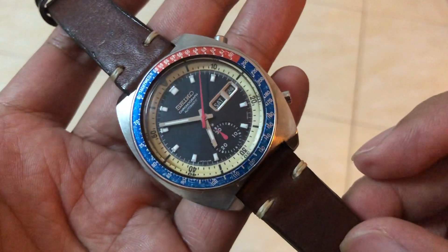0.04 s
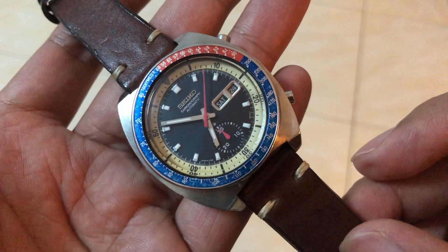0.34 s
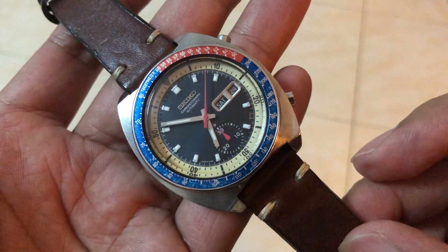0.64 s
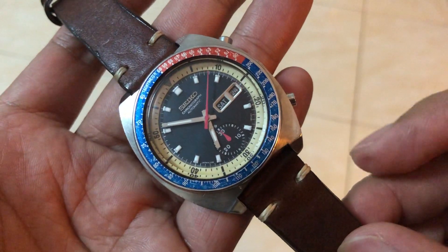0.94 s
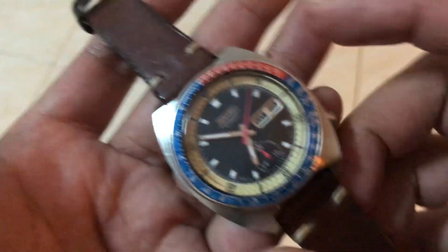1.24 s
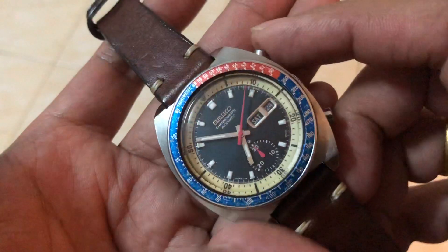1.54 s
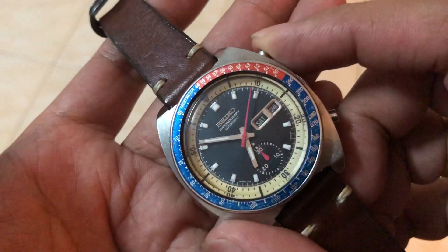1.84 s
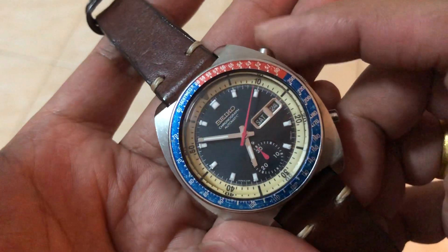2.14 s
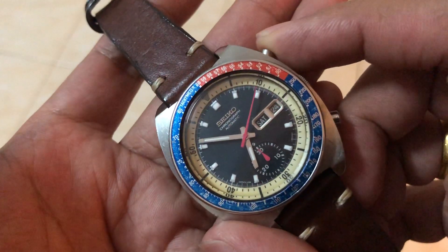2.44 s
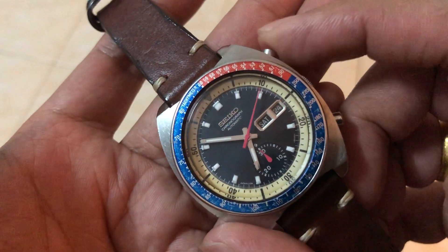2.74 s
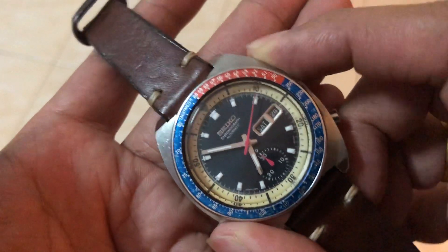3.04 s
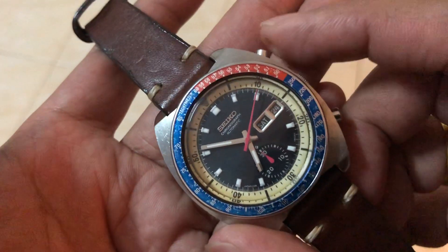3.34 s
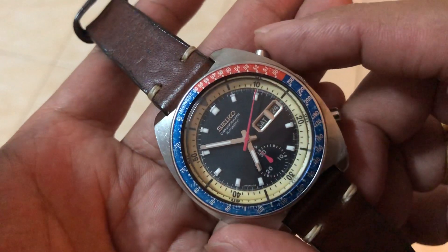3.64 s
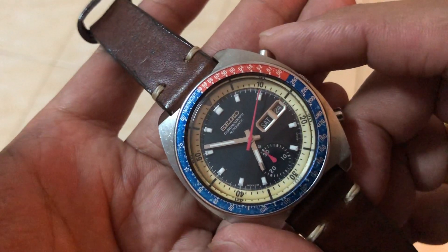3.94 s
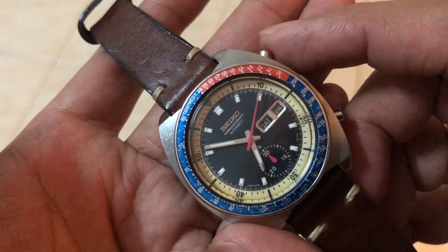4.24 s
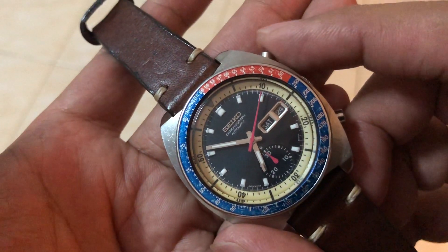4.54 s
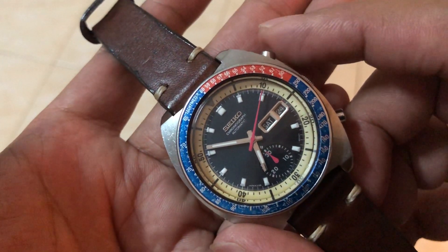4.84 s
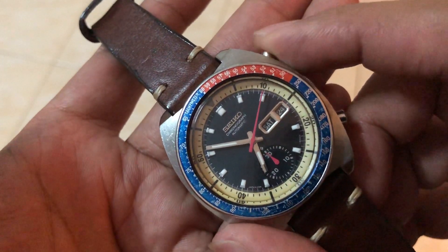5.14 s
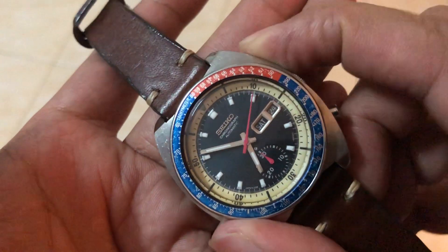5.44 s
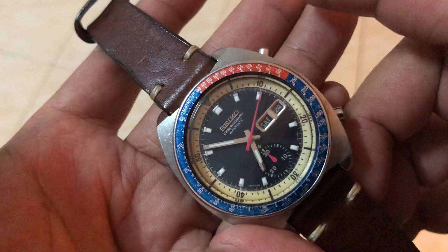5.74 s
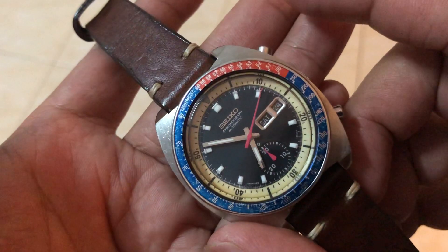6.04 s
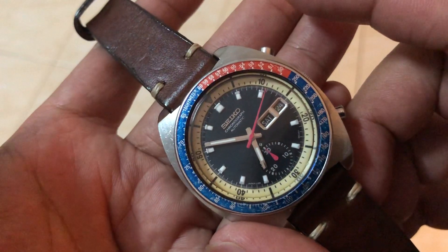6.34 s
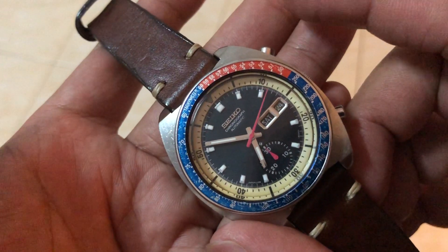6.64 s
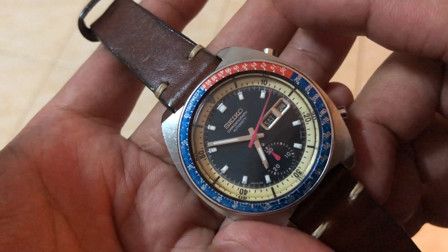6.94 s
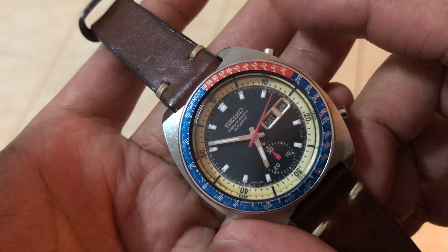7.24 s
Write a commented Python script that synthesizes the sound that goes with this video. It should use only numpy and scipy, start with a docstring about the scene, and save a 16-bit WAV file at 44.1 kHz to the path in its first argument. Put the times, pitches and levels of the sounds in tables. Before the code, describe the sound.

A mechanical wristwatch ticks faintly close to the microphone, about six thin, high ticks a second, growing slightly clearer over the first second and a half. Behind it, a distant appliance gives a low, wavering hum and a soft airy swish about twice a second. Between 2 and 3 seconds, a few tiny clicks come from the button taking up its slack. At 3 seconds the button is pressed with a sharp, bright metallic snap that dies almost at once, and at 3.2 seconds it springs back with a lighter click. At about 5.4 seconds comes a second snap, slightly fuller, followed by a softer release click near 5.6 seconds. Both presses stand far above the background and leave a very brief echo in the small furnished room. The faint ticking and hum continue to the end, at around 7.5 seconds.

```python
"""Two presses of a mechanical stopwatch button

A watch is held close by in the hand. Each press snaps a lever against the steel case, which rings
briefly, and the sprung button clicks back a moment later. The watch ticks faintly throughout.
A small room echoes the snaps over the hum and slow swish of a distant appliance."""
import sys
import numpy as np
from scipy import signal
from scipy.fft import rfft, irfft
from scipy.io import wavfile
from scipy.ndimage import uniform_filter1d

SR = 44100
rng = np.random.default_rng(int(sys.argv[2]) if len(sys.argv) > 2 else 0)


def dump(signal):
    """Clip the signal to [-1, 1] and save it as 16-bit WAV at the path in sys.argv[1]."""
    limited = np.clip(np.atleast_2d(signal).T, -1, 1)
    pcm = np.round(limited * 32767).astype(np.int16)
    wavfile.write(sys.argv[1], SR, pcm)


N = 325971
T = np.arange(N) / SR

# Lever snaps. Levels are relative; knock, body and edge are the low, middle and high parts of the ring.
# Columns: start_s, level_db, knock_db, body_db, edge_db, slide_s, slide_db, rebound_s,
# rebound_share (negative off the opposite stop), thump_db, thump_hz, room_db
SNAPS = [(3.00403, -4.9, 1.5, -4.5, -1.8, .0012, -21, .00049, .22, -35, 250, -2),
         (5.37435, -3.7, -5.6, 7, -3.6, .0005, -23, .00024, -.6, -32, 500, -1.5)]
# Ringing tones of the steel case, damped by the palm: pitch_hz, width_hz, level_db
CASE_TONES = [(1250, 500, -13), (2220, 580, -6), (3600, 500, -16), (4365, 380, .3), (5390, 530, -2),
              (5785, 515, -6), (7160, 375, -8.5), (8150, 400, -6.5), (9300, 270, -7), (11455, 520, -12),
              (12450, 620, -6), (13600, 450, -9.5), (15200, 700, -19)]


def undb(db):
    """Turn decibels into a gain."""
    return 10 ** (np.asarray(db) / 20)


def unit(x):
    """Scale a sound to an average (rms) level of 1."""
    return x / np.sqrt(np.mean(x ** 2))


def add(track, start_s, sound):
    """Mix a sound into a track."""
    i = int(round(start_s * SR))
    track[i:i + len(sound)] += sound[:max(N - i, 0)]


def noise(points, size):
    """Noise of level 1, shaped by rows of pitch_hz, level_db."""
    hz, db = np.transpose(points)
    freqs = np.fft.rfftfreq(size, 1 / SR)
    gain = undb(np.interp(np.log(freqs + 1), np.log(hz), db))
    return unit(irfft(rfft(rng.standard_normal(size)) * gain, size))


def wander(rate_hz):
    """A smooth random drift with a spread of 1."""
    hold = int(SR / rate_hz)
    steps = np.repeat(rng.standard_normal(N // hold + 1), hold)
    return unit(uniform_filter1d(uniform_filter1d(steps, hold), hold)[:N])


def resonate(x, hz, width_hz):
    """Ring at one pitch; the narrower the width, the longer the ring."""
    return signal.lfilter(*signal.iirpeak(hz, hz / width_hz, fs=SR), x)


def ring(push, tones, length=1):
    """A push sets all the tones of a metal part ringing; length stretches their decay."""
    return sum(undb(db) * resonate(push, hz, width / max(length, .3)) for hz, width, db in tones)


def wavering_tone(hz, waver, rate_hz=7):
    """A tone whose level and phase drift at random."""
    drift = 1 + waver * (wander(rate_hz) + 1j * wander(rate_hz))
    return unit(np.real(drift * np.exp(2j * np.pi * (hz * T + rng.random()))))


def hum():
    """A distant appliance hums on several wavering tones."""
    # Tones of the hum: pitch_hz, level_db, waver_share
    tones = [(150.4, -69, 0.99), (199.8, -62.5, 0.5), (300.8, -62.5, .45), (542, -74.5, 1),
             (821, -77, 0.69), (2003, -88.5, 0.99)]
    return sum(undb(db) * wavering_tone(hz, waver) for hz, db, waver in tones)


def drones(rise_s=.25, fall_s=.4):
    """Low tones that each swell once and sink back."""
    # Swelling tones: pitch_hz, start_s, end_s, rest_db, full_db
    swells = [(48.8, 0.35, 4.03, -74.5, -68.5), (106, 4.25, 7.63, -71.5, -63),
              (166.8, 4.34, 5.7, -76.5, -61.5)]
    out = np.zeros(N)
    for hz, start_s, end_s, rest_db, full_db in swells:
        swell = np.clip(np.minimum((T - start_s) / rise_s, (end_s - T) / fall_s), 0, 1)
        out += undb(rest_db + (full_db - rest_db) * swell) * wavering_tone(hz, waver=.5)
    return out


def airflow(air_db=-60, rush_db=-.93):
    """Soft room noise and air rushing through the appliance."""
    # Tone of the room's still air: pitch_hz, level_db
    still_air = [(15, -37.5), (25, -18.5), (45, -8.5), (75, -9.5), (110, -10.5), (200, -11.5), (263, -11),
                 (301, -7), (416, -17), (531, -14), (714, -17.5), (840, -16), (1650, -29.5), (15500, -48)]
    # Resonances in the appliance's airflow: pitch_hz, width_hz, level_db
    duct_tones = [(235, 97, -70), (289, 95, -63), (868, 180, -74), (1467, 120, -84), (2130, 400, -83),
                  (3530, 230, -89.5), (14760, 900, -88)]
    air = undb(air_db) * noise(still_air, N)
    for hz, width, db in duct_tones:
        band = resonate(rng.standard_normal(N), hz, width)
        air += undb(db) * unit(resonate(band, hz, width))
    # only the middle range swishes; rumble and hiss stay even
    rush = signal.sosfiltfilt(signal.butter(2, [420, 2600], "band", fs=SR, output="sos"), air)
    return air + rush * (undb(rush_db) * swish() - 1)


def swish(turn_s=.508, depth_db=3.0, uneven=.25, sharpness=1.9):
    """Gain of the airflow: something turning in the appliance swishes about twice a second."""
    turns = (T - .13) / turn_s
    pulse = np.exp(sharpness * (np.cos(2 * np.pi * turns) - 1))
    return undb(depth_db * (1 + uneven * wander(rate_hz=2.6)) * pulse)


def ticks(first_s=.0217, swing_s=.33303, tock_s=.169, contact_s=.00081, level_db=-47, uneven_db=.8):
    """The escapement, the catch that paces the watch, strikes twice per swing of the balance wheel."""
    # Ringing tones of the escapement: pitch_hz, width_hz, level_db
    tones = [(6300, 410, 1), (8110, 450, -1.5), (9200, 560, -1.5), (11000, 720, 0), (12830, 1200, -11.5)]
    turned_away_db, turn_s = -4.5, 1.5  # ticks grow louder as the hand turns the watch into position
    out = np.zeros(N)
    t = np.arange(SR // 100) / SR
    swings = np.arange(first_s, N / SR, swing_s)
    for start_s in np.concatenate([swings, swings[:-1] + tock_s]):
        tick = ring(rng.standard_normal(len(t)) * np.exp(-t / contact_s), tones)
        db = level_db + turned_away_db * max(1 - start_s / turn_s, 0) + uneven_db * rng.standard_normal()
        add(out, start_s, undb(db) * tick / np.linalg.norm(tick))
    return out


def blow(rebound_s=0, share=0):
    """The force of one sharp hit and its rebound, if any."""
    push = np.zeros(SR // 40)
    push[0] = 1
    return push + share * np.maximum(1 - abs(np.arange(len(push)) - rebound_s * SR), 0)


def colour(x, knock_db, body_db, edge_db):
    """Where and how hard the case is struck shifts the balance of its low and high tones."""
    size = 2 * len(x)
    corners_hz = [2400, 3400, 4400, 5400, 6800, 8200]
    db = np.interp(np.fft.rfftfreq(size, 1 / SR), corners_hz, [knock_db, body_db, body_db, 0, 0, edge_db])
    # fold the filter forward in time, so that nothing sounds before the hit
    cepstrum = irfft(np.log(undb(db)), size)
    cepstrum[1:len(x)] *= 2
    cepstrum[len(x) + 1:] = 0
    return irfft(rfft(x, size) * np.exp(rfft(cepstrum)), size)[:len(x)]


def smear(x):
    """Bending waves cross the case at unequal speeds, so a click spreads over a few cycles."""
    # Bands that the case passes on late: pitch_hz, width_hz
    late_bands = [(6620, 660), (8800, 800), (12900, 1000)]
    for hz, width in late_bands:
        x = x - 2 * resonate(x, hz, width)
    return x


def button_clicks(force_db=16, chatter=.055, chatter_s=.0005, room_db=-16.5):
    """The sprung button takes up its slack and springs back, each light contact chattering briefly."""
    # Button contacts: start_s, level_db, knock_db, body_db, edge_db
    contacts = [(2.0748, -48.5, -4, 4, 1), (2.5481, -35.5, -6, 8, 7), (2.7854, -44.5, -13, 4, 5.5),
                (2.8977, -45, 3, 12, 6.5), (3.1821, -18.5, -18, -8, 1), (3.1985, -34, -1, 1, 1),
                (5.5386, -48.5, -6.5, 10, 5), (5.5674, -24.5, -11, 0.5, 8.5), (5.6063, -35.5, -0.5, 0, -2)]
    direct, to_room = np.zeros(N), np.zeros(N)
    for start_s, db, knock_db, body_db, edge_db in list(contacts) + spring_creaks():
        push = blow(rebound_s=.00081, share=.39)
        t = np.arange(len(push)) / SR
        push += chatter * rng.standard_normal(len(t)) * np.exp(-t / chatter_s)
        push = undb(db + force_db) * colour(push, knock_db, body_db, edge_db)
        add(direct, start_s, smear(ring(push, CASE_TONES, length=1.35)))
        add(to_room, start_s, undb(room_db) * push)
    return direct, to_room


def spring_creaks(count=4, before_s=.14, after_s=.18, level_db=-51, spread_db=6):
    """Extra button contacts: the spring creaks at random under the finger around each snap."""
    knock_db, body_db, edge_db = -8.5, -1.5, 6
    rows = []
    for snap_s, *_ in SNAPS:
        for place, softness in rng.random((count, 2)):
            start_s = snap_s - before_s + place * (before_s + after_s)
            rows.append((start_s, level_db - spread_db * softness, knock_db, body_db, edge_db))
    return rows


def lever_snaps(force_db=14.5):
    """The lever scrapes over its catch, hits home and rebounds; the whole watch jolts in the hand."""
    direct, to_room = np.zeros(N), np.zeros(N)
    for (start_s, db, knock_db, body_db, edge_db, slide_s, slide_db,
         rebound_s, share, thump_db, thump_hz, room_db) in SNAPS:
        hit = blow(rebound_s, share)
        t = np.arange(len(hit)) / SR
        scrape = undb(slide_db) * rng.standard_normal(len(t)) * (t < slide_s) / 2
        for at_s, force in [(start_s - slide_s, scrape), (start_s, hit)]:
            push = colour(force, knock_db, body_db, edge_db)
            add(direct, at_s, undb(db + force_db) * smear(ring(push, CASE_TONES)))
        add(direct, start_s + rebound_s, undb(thump_db) * jolt(thump_hz))
        # the room hears all sides of the watch, which evens out the tone
        add(to_room, start_s, undb(room_db) * colour(blow(), knock_db / 2, body_db / 2, edge_db))
    return direct, to_room


def jolt(hz, damping=.75):
    """The watch bounces in the soft palm for a cycle or two."""
    width = hz * damping
    thump = resonate(resonate(blow(), hz, width), hz, width)
    return thump / np.abs(thump).max()


def room_echo(x, rise_s=.0022, decay_s=.18, tail_s=.38, tail_db=-15):
    """Dense echoes of a small furnished room, with a weak longer tail; decay times are to -60 dB."""
    # Tone of the echo: pitch_hz, level_db
    echo_tone = [(300, -5), (1000, -9), (1600, -11.5), (2200, -5), (2900, -11.5), (5000, -7), (5650, 2),
                 (6400, -3.5), (7200, -5.5), (9400, -6), (11500, -15.5), (15500, -16.5)]
    t = np.arange(SR // 2) / SR
    fade = undb(-60 * t / decay_s) + undb(tail_db - 60 * t / tail_s)
    echo = noise(echo_tone, len(t)) * fade * np.clip(t / rise_s, 0, 1)
    return signal.fftconvolve(x, echo / np.linalg.norm(echo))[:N]


def scene(room_db=-14, bounce_db=-30, bounce_s=.0051):
    """Mix the close watch, its bounce off a nearby surface, the room's echo and the background."""
    snaps, snaps_to_room = lever_snaps()
    clicks, clicks_to_room = button_clicks()
    watch = snaps + clicks + ticks()
    echo = undb(room_db) * room_echo(snaps_to_room + clicks_to_room)
    out = watch + echo + hum() + drones() + airflow()
    add(out, bounce_s, undb(bounce_db) * watch)
    return out[None]


def record(dry, top_hz=15900):
    """Cut away the very highest treble."""
    return signal.sosfiltfilt(signal.ellip(8, .1, 50, top_hz, fs=SR, output="sos"), dry)


dry = scene()
out = record(dry)
dump(out)
```